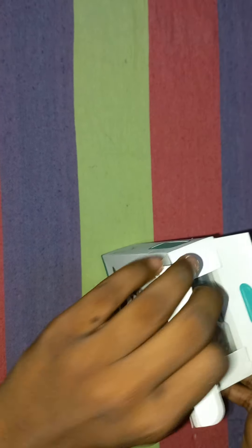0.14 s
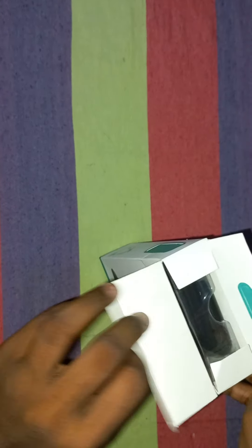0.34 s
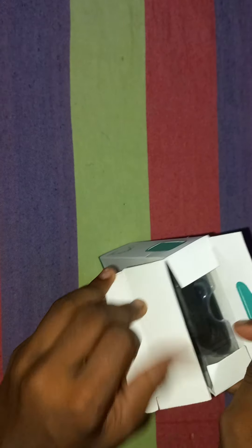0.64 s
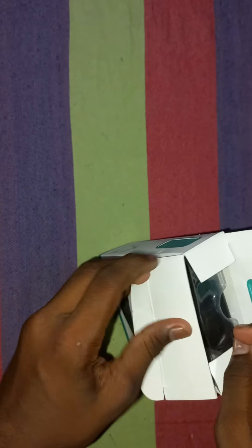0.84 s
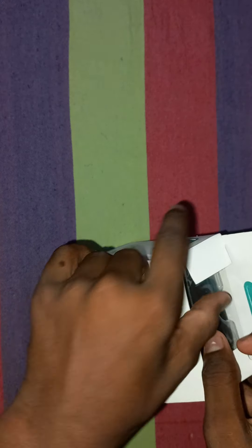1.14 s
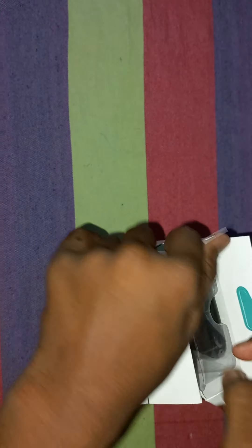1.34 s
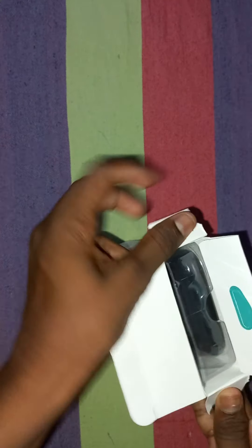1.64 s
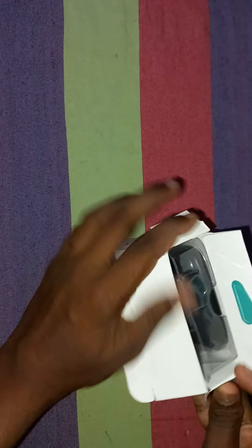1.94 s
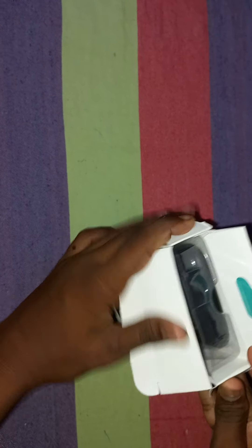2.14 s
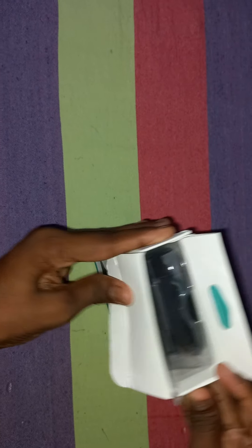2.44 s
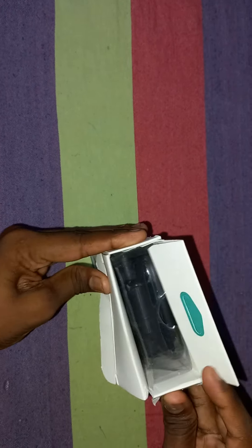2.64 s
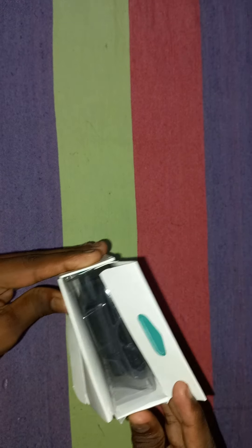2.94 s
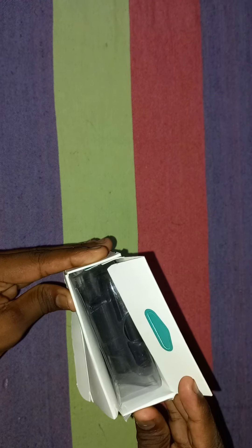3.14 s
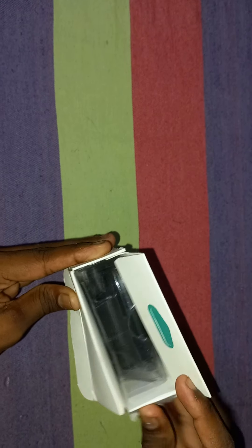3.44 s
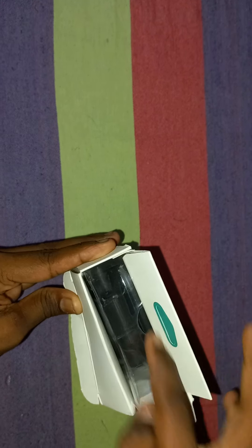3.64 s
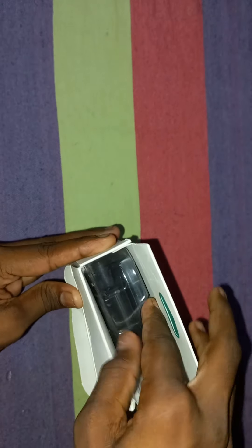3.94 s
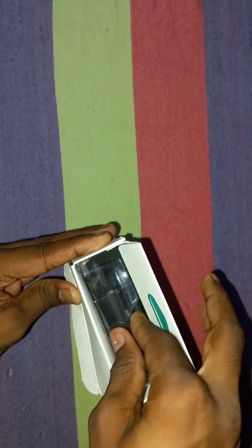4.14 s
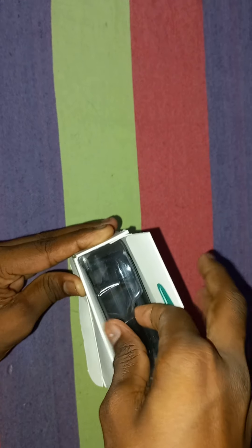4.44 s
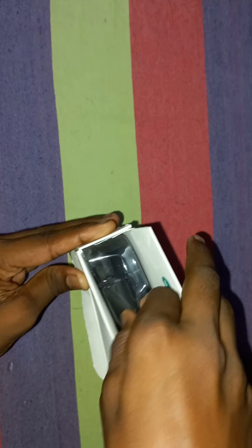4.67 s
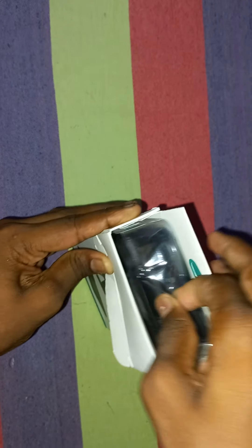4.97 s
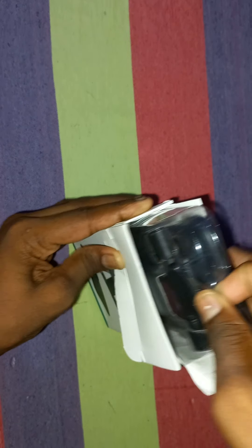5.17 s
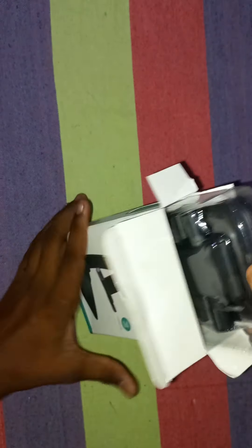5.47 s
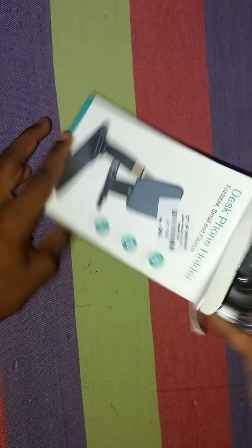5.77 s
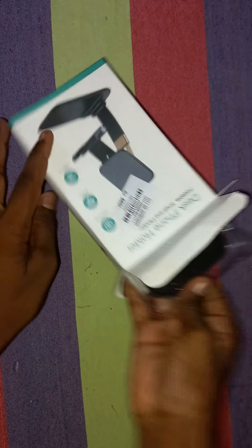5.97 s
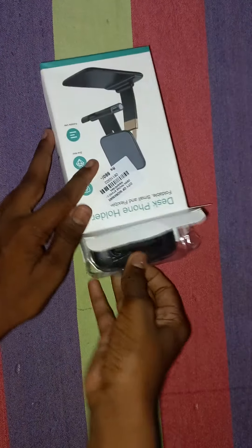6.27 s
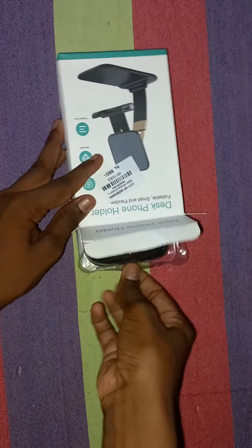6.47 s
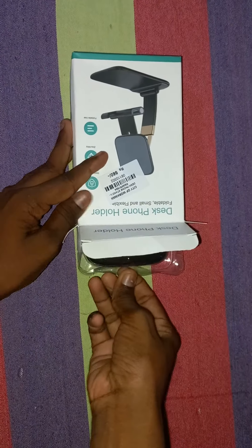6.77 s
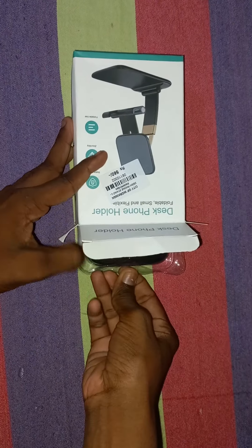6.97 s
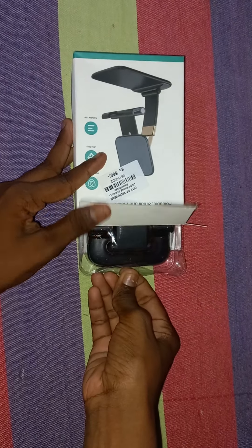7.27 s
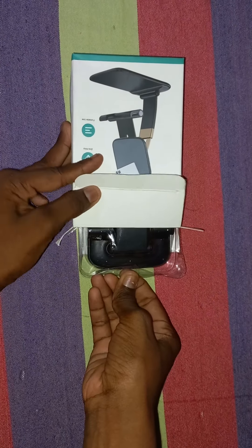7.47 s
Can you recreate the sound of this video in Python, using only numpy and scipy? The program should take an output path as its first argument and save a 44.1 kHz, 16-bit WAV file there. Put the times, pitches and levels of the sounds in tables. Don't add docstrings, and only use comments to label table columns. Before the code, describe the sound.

Indoors, close to a phone microphone, with handling brighter and stronger on the left. At 0 s a hard card snap and crunch burst out with a hollow knock, then grainy rubbing and small ticks thin out until 1.5 s. Around 1.65 s a tight cluster of cracks and a knock, a soft crunch at 2.05, rubbing with faint bumps near 2.2, and a single snap at 2.5. It is quiet from 3 to 4 s. From 4.05 to 5.7 s plastic crackles and snaps sharply, strongest near 4.6, 4.75 and 5.14, with steady hissy sliding around 5. Ticks and a light knock at 6.05, a snap at 6.3, then a soft low bump on the bed at 6.43 and a papery crunch at 6.8. Only tiny ticks remain to about 7.5. Beneath lie low traffic rumble, faint hum, and a distant engine rising in pitch, gone after 5 s.

```python
import sys
import numpy as np
from scipy import signal
from scipy.fft import rfft, irfft
from scipy.io import wavfile
from scipy.ndimage import uniform_filter1d

SR = 44100
rng = np.random.default_rng(int(sys.argv[2]) if len(sys.argv) > 2 else 0)


def wrap_up_sound(samples):
    columns = np.atleast_2d(samples).T
    tamed = np.clip(columns, -1, 1)
    steps = np.round(tamed * 32767).astype(np.int16)
    wavfile.write(sys.argv[1], SR, steps)


def amplitude_ratio(level_db):
    exponent = np.asarray(level_db, float) / 20
    return 10 ** exponent


N = 335601


def rms_one(x):
    return x / np.sqrt(np.mean(x ** 2) + 1e-20)


def peak_one(x):
    return x / np.max(np.abs(x), axis=-1, keepdims=True)


def in_time(rows):
    s, *columns = np.transpose(rows)
    return [np.interp(np.arange(N) / SR, s, column) for column in columns]


def at_hz(points, hz):
    point_hz, point_db = np.transpose(points)
    return np.interp(np.log(hz), np.log(point_hz), point_db)


def drift(rate):
    r = np.exp(-80 * np.pi * rate / SR)
    noise = rng.standard_normal(N // 40 + 2002)
    slow = signal.lfilter([1], [1, -2 * r, r * r], noise)[2000:]
    return np.interp(np.arange(N) / 40, np.arange(len(slow)), rms_one(slow))


def coloured(x, spectrum):
    hz = np.arange(1, N // 2 + 2) * SR / N
    inside = (hz > spectrum[0][0]) & (hz < spectrum[-1][0])
    return irfft(rfft(x) * amplitude_ratio(at_hz(spectrum, hz)) * inside, N)


def band(x, low_hz, high_hz):
    limits = [low_hz, min(high_hz, .45 * SR)]
    return signal.sosfilt(signal.butter(3, limits, "band", fs=SR, output="sos"), x)


def ring(x, hz, t60):
    r = amplitude_ratio(-60 / (t60 * SR))
    w = 2 * np.pi * min(hz, .45 * SR) / SR
    return signal.lfilter([0, np.sin(w)], [1, -2 * r * np.cos(w), r * r], x)


def add(out, s, sound):
    i = round(s * SR)
    out[:, i:i + sound.shape[1]] += sound[:, :N - i]


def air():
    # (time [s], level [dB])
    traffic = [(0.0, -50), (0.32, -51), (1.31, -56), (1.61, -47.5), (1.95, -55.5), (2.41, -50), (2.75, -54),
               (3.18, -53.5), (3.5, -60), (4.15, -50), (4.81, -58), (5.55, -53.5), (5.7, -60), (6.72, -51),
               (7.0, -61), (7.61, -57.5)]
    # (frequency [Hz], level [dB per Hz])
    air_colour = [(25, -34.5), (65, -6), (125, -5), (250, -19), (350, -16), (520, -18.5), (600, -24.5),
                  (1500, -25.5), (2400, -29.5), (3500, -38), (4600, -46), (6500, -44.5), (8300, -55),
                  (16500, -56.5)]
    # (frequency [Hz], likeness [0 to 1])
    likeness = [(60, 1), (180, 0.92), (550, 0.61), (1650, 0), (4970, 0.046), (15000, 0)]
    # (frequency [Hz], difference [dB])
    air_balance = [(60, 2.5), (380, -1.5), (2380, -3.5), (15000, 2)]
    rumble_db, = in_time(traffic)
    t = np.arange(N) / SR
    murmur_db = -53.5 + 0.051 * (rumble_db - rumble_db.mean())
    murmur_db -= 0.2669 * t
    murmur_db += 8.5 * np.exp(-t / 0.1)

    hz = np.arange(1, N // 2 + 2) * SR / N
    alike = np.sqrt(np.clip(at_hz(likeness, hz), 0, 1))
    mid, side = rfft(rng.standard_normal((2, N)))
    pair = np.sqrt(1 + alike) * mid + np.sqrt(1 - alike) * side * [[1], [-1]]
    pair *= amplitude_ratio(at_hz(air_colour, hz) + at_hz(air_balance, hz) * [[.5], [-.5]])
    bass = 1 / (1 + (hz / 270) ** 4)
    rumble = rms_one(irfft(pair * bass, N)) * amplitude_ratio(rumble_db + 0.926 * drift(9.7))
    murmur = rms_one(irfft(pair * (1 - bass), N)) * amplitude_ratio(murmur_db + 0.5 + 1.8 * drift(5.5))
    return rumble + murmur


def engine():
    # (time [s], firing rate [Hz], level [dB], double-rate tone against the first [dB])
    speed = [(0.0, 61, -49, -7), (0.08, 65, -43.5, -5.5), (0.82, 67.3, -50, -7.5), (1.3, 68.5, -59, -2),
             (1.6, 71.35, -53.5, -9), (2.2, 76.8, -58, 4), (2.75, 78.9, -58, -5), (3.25, 80.9, -52, -12),
             (3.5, 82, -71, 0), (3.75, 82.6, -51, -12), (4.19, 85.8, -49, -16), (4.72, 89.3, -56.5, -14),
             (5.0, 92, -60, -5)]
    # (frequency [Hz], rms level [dB])
    hums = [(100, -72), (124, -64), (198, -68)]
    hz, first_db, overtone_db = in_time(speed)
    second_db = first_db + overtone_db
    turn = 2 * np.pi * np.cumsum(hz + 0.62 * drift(9.2)) / SR
    first = amplitude_ratio(first_db + 1.64 * drift(7.6)) * np.sin(turn)
    second = amplitude_ratio(second_db + 2.0 * drift(11)) * np.sin(2 * turn)
    away = np.clip((speed[-1][0] - np.arange(N) / SR) / 0.33, 0, 1)
    hum = np.zeros(N)
    for hum_hz, db in hums:
        level = amplitude_ratio(db + 4.2 * drift(5.8))
        hum += level * np.sin(2 * np.pi * np.cumsum(hum_hz + 0.827 * drift(3.44)) / SR)
    return np.sqrt(2) * (away * (first + second) + hum)


def pressure(strokes, levels_db, rise, fall, rest_db):
    t = np.arange(0, N + 64, 64) / SR
    power = amplitude_ratio(2 * rest_db)
    for (s, hold_ms, *_), db in zip(strokes, levels_db):
        before = np.maximum(s - t, 0)
        after = np.maximum(t - s - hold_ms / 1000, 0)
        power = power + amplitude_ratio(2 * (db - rise * before - fall * after))
    return np.interp(np.arange(N) / SR, t, 10 * np.log10(power))


def rub():
    # (time [s], hold [ms], rustle [dB], hiss against rustle [dB])
    strokes = [(0.0, 50, -50, -8), (0.187, 8, -55, -2.5), (0.52, 8, -61, -6), (0.695, 90, -62.5, -5.5),
               (1.002, 8, -62.5, -2.5), (1.319, 8, -62, -3.5), (1.575, 8, -67, 1), (1.659, 8, -56, -3),
               (1.909, 150, -58, -1.5), (2.18, 124, -57.5, -0.5), (2.525, 8, -55.5, -6.5),
               (2.765, 31, -56, 0.5), (3.473, 110, -68, -3), (3.815, 29, -62, -3), (3.885, 18, -61, -5),
               (4.069, 8, -58.5, -3), (4.272, 8, -64, -5), (4.613, 8, -57.5, 2), (4.754, 30, -57.5, -8),
               (4.92, 220, -52.5, -3.5), (5.29, 60, -65, -1), (5.402, 40, -61.5, -6),
               (5.529, 15, -54, -3.5), (5.86, 8, -59, -4), (6.065, 8, -59.5, -5), (6.226, 8, -57, -4),
               (6.42, 66, -57.5, -5.5), (6.8, 27, -56.5, -4), (7.167, 8, -73.5, 0), (7.523, 8, -68, -8)]
    # (frequency [Hz], level [dB per Hz])
    rustle_colour = [(1200, -14), (2000, -3.5), (3200, 2.5), (4500, -12.5), (6300, -4.5), (8000, -15)]
    # (frequency [Hz], level [dB per Hz])
    hiss_colour = [(8000, -14), (9500, -11.5), (11500, -1.5), (13500, -3), (15800, -3)]
    # (frequency [Hz], level [dB per Hz])
    far_hiss_colour = [(4000, 7), (7000, -9.5), (10000, 1.5), (14000, -5), (15800, -3)]
    _, _, level_db, smooth_db = np.transpose(strokes)
    rustle_db = pressure(strokes, level_db, rise=140, fall=102.5, rest_db=-69)
    hiss_db = pressure(strokes, level_db + smooth_db, rise=269, fall=188, rest_db=-89.5)

    grains = amplitude_ratio(3.0 * np.minimum(rng.exponential(1, (2, N)), 5)) * rng.standard_normal((2, N))
    lone = rng.random(N) < 70 / SR
    grains *= 1 + 2.04 * uniform_filter1d(16.7 * lone, size=40)
    grains[1] = 0.23 * grains[0] + 0.9 * grains[1]
    catch_db = drift(74)
    near_hiss = rms_one(coloured(grains[0], hiss_colour))
    far_hiss = rms_one(coloured(grains[1], far_hiss_colour))
    hiss = np.array([near_hiss, far_hiss]) * amplitude_ratio(0.87 * catch_db)
    hiss *= amplitude_ratio([hiss_db + 1.0, hiss_db - 13.5])
    rustle = rms_one(coloured(grains, rustle_colour) * amplitude_ratio(0.72 * catch_db))
    return hiss + rustle * amplitude_ratio([rustle_db + 0.5, rustle_db - 11])


def slips(count, dense):
    x = rng.standard_normal((2, count)) * (rng.random(count) < dense)
    return np.array([x[0], 0.35 * x[0] + 1.96 * x[1]])


def near_bands(body, burst_upper, burst_treble, upper_db, treble_db, scale):
    sound = scale(body) * amplitude_ratio([[0], [-13.5]])
    sound = sound + scale(burst_upper) * amplitude_ratio([[upper_db], [upper_db - 13]])
    return sound + scale(burst_treble) * amplitude_ratio([[treble_db], [treble_db - 20.5]])


def crunches():
    # (time [s], length [ms], body [dB], 6 kHz against body [dB], treble against body [dB])
    folds = [(.025, 27, -38.5, -11, -5), (0.773, 21, -66.5, -9, 2), (0.986, 34, -56.5, -9, -6),
             (1.637, 13, -55, -12, -2), (2.053, 39, -46.5, -17, -4), (4.045, 41, -48.5, -8.5, -8),
             (6.44, 34, -54.5, -9, -10), (6.802, 51, -53, 1, -6)]
    out = np.zeros((2, N))
    flap_hz = 3140
    t_ms = np.arange(4096) / SR * 1000
    for s, length_ms, body_db, upper_db, treble_db in folds:
        burst = slips(4096, dense=.4)
        clumps = amplitude_ratio(4.0 * np.repeat(rng.standard_normal(64), 64))
        burst *= clumps * np.clip((length_ms - t_ms) / 6, 0, 1) * np.clip(t_ms / 5, 0, 1)
        flap = ring(burst, flap_hz, 0.0072) + 0.49 * ring(burst, 0.537 * flap_hz, 0.0085)
        body = rms_one(band(flap, 1300, 7100)) + 0.58 * rms_one(band(burst, 1450, 4050))
        upper, treble = band(burst, 5430, 6800), band(burst, 10600, 18400)
        sound = near_bands(body, upper, treble, upper_db, treble_db, rms_one)
        add(out, s, amplitude_ratio(body_db) * np.sqrt(t_ms[-1] / length_ms) * sound)
    return out


def ticks(table):
    pitches = rng.uniform(2270, 3450, len(table))
    return [(s, db, hz, -6.5 + 0.75 * treble_db, treble_db)
            for (s, db, treble_db), hz in zip(table, pitches)]


def snaps():
    # (time [s], peak [dB], strongest ring [Hz], 6 kHz against peak [dB], treble against peak [dB])
    cracks = [(0.0254, -20, 2980, -9, 0), (0.043, -6, 3900, -16.5, -8.5), (0.0523, -26, 4460, -2, 9.5),
              (0.149, -30.5, 4200, -8, 1), (1.6483, -18.5, 3280, -13, 0), (1.653, -14, 3060, -10, -8),
              (1.666, -15, 2970, -12, -2.5), (2.4912, -22, 3220, -13.5, -8), (4.057, -26.5, 3070, -24, -2),
              (4.169, -30.5, 2850, -20, -17), (4.416, -24, 3040, -17, -19),
              (4.563, -30.5, 2660, -11.5, -22), (4.6013, -14.5, 2600, -10, 1.5),
              (4.6573, -27.5, 2380, -14, -12), (4.7445, -17, 2650, -7.5, 4.5), (4.7574, -23, 3865, -8, -4),
              (4.8533, -17.5, 2926, -18, -12), (5.14, -12.5, 3340, -8.5, 0.5), (5.3972, -25, 2030, -20, -7),
              (5.5114, -23.5, 2840, -10, -19), (5.5159, -18, 3600, -7.5, 14), (5.694, -41.5, 1614, 6, 2),
              (6.3109, -18, 3630, -11, -7.5), (6.45, -27, 2900, -11, -13.4)]
    # (time [s], peak [dB], treble against peak [dB])
    flap_ticks = [(0.2068, -36.5, 4.5), (0.298, -40.5, -3), (0.3424, -48, 7), (0.454, -55, 6),
                  (0.5446, -35.5, -25), (0.673, -40.5, -7), (0.787, -34.5, -12), (0.9082, -39.5, -12),
                  (0.9941, -45, -8), (1.009, -33, -6), (1.3233, -43.5, 2), (1.435, -54, 6),
                  (1.5586, -37.5, -4), (1.5937, -38, -11), (2.0266, -34, -19), (2.0607, -32, -22),
                  (2.201, -41, -3), (2.7065, -39, -6), (2.9175, -46, -25), (2.9986, -48, -4),
                  (3.452, -48.5, 2), (3.5454, -59, 10), (6.8125, -31.5, -0.5), (6.8315, -44, 3),
                  (7.148, -48, -2), (7.4994, -63, 8), (7.533, -42.5, -19)]
    # (time [s], peak [dB], treble against peak [dB])
    tray_ticks = [(4.0183, -64, 20), (4.0895, -35.5, -17), (4.282, -39.5, -32), (4.3908, -45, -19),
                  (4.477, -43, -6), (4.5114, -39.5, -12), (4.533, -61, 15), (4.7205, -41, 4),
                  (4.92, -30, -1.5), (5.1165, -40, 5.5), (5.2325, -38.5, 0.5), (5.276, -51, 10),
                  (5.298, -42.5, -0.5), (5.326, -42.5, -14.5), (5.339, -36, -12), (5.392, -48.5, -9.5),
                  (5.4306, -43, -8), (5.4625, -36, -4), (5.528, -39, 11), (5.841, -32, -5.5),
                  (6.051, -30, -8.5), (6.1558, -37, -6), (6.202, -55, 15), (6.2353, -35, -8),
                  (6.4283, -38, -10)]
    out = np.zeros((2, N))
    t = np.arange(2048) / SR
    sheet_t60 = 0.0042
    for s, peak_db, mode_hz, upper_db, treble_db in cracks + ticks(flap_ticks) + ticks(tray_ticks):
        length_ms = 6.53 - 0.26 * (peak_db + 19) + 0.1 * max(treble_db, 0)
        burst = slips(len(t), dense=.3)
        burst[:, 0] = 3.96
        fade = amplitude_ratio(-20 * (1000 * t / max(length_ms, .5)) ** 1.36)
        settling = amplitude_ratio(-18.5 - 470 * t)
        burst *= fade + settling

        near_mode = ring(burst[0], mode_hz, sheet_t60)
        far_mode = ring(burst[1], .8 * mode_hz, sheet_t60)
        mode = np.array([near_mode, far_mode])
        mode += .5 * ring(burst, rng.uniform(2200, 3900), sheet_t60)
        mode += 0.13 * ring(burst, 0.66 * mode_hz, sheet_t60)
        body = peak_one(band(mode, 1380, 6100)) + 0.13 * peak_one(band(burst, 2200, 3900))
        upper, treble = band(burst, 5560, 7600), band(burst, 10770, 15960)
        sound = near_bands(body, upper, treble, upper_db, treble_db, peak_one)
        add(out, s, amplitude_ratio(peak_db) * sound)
    return out


def thuds(table, t60, swell_ms, level_db):
    out = np.zeros((2, N))
    push = np.zeros(8192)
    touch = np.hanning(max(round(swell_ms * SR / 1000), 3))
    for s, peak_db, hz in table:
        push[:len(touch)] = touch * np.sin(2 * np.pi * hz * np.arange(len(touch)) / SR)
        sound = ring(push, hz, t60)
        sound += 0.21 * ring(push, 1.174 * hz, t60)
        sound += 0.34 * ring(push, .5 * hz, 1.23 * t60)
        add(out, s, amplitude_ratio(peak_db + level_db) * peak_one(sound) * np.ones((2, 1)))
    return out


def knocks():
    # (time [s], peak [dB], pitch [Hz])
    taps = [(0.0426, -27.5, 453), (0.059, -35, 427), (1.647, -29, 460), (1.659, -33.5, 445),
            (2.491, -41.5, 960), (4.053, -48, 377), (4.168, -39.5, 530), (4.414, -42.5, 860),
            (4.922, -40.5, 427), (5.138, -39, 374), (6.047, -32, 370), (6.059, -37, 400), (5.032, -45, 900),
            (5.606, -47, 600), (6.815, -48, 1050)]
    out = thuds(taps, t60=0.057, swell_ms=2.2, level_db=0.14)
    t = np.arange(2048) / SR
    for s, peak_db, _ in taps:
        clatter = band(slips(len(t), dense=0.076) * amplitude_ratio(-2500 * t), 695, 1030)
        add(out, s, amplitude_ratio(peak_db - 2.0) * peak_one(clatter) * amplitude_ratio([[0], [-4]]))
    return out


def bumps():
    # (time [s], peak [dB], pitch [Hz])
    landings = [(2.2, -43, 70), (2.285, -42.5, 117.8), (6.45, -40, 60.4), (5.43, -44.5, 123),
                (6.05, -41.5, 123), (6.426, -31, 120.6), (6.519, -38.5, 116), (7.43, -45, 122.5)]
    return thuds(landings, t60=0.12, swell_ms=45, level_db=0.1)


def room(x):
    t = np.arange(SR // 2) / SR
    t60 = 0.33
    tail = rng.standard_normal((2, len(t))) * amplitude_ratio(-60 * t / t60) * (t > .006)
    dulled = signal.lfilter([1], [1, -0.42], tail)
    tail = rms_one(dulled) / np.sqrt(len(t))
    return signal.fftconvolve(tail, x[:1], axes=1)[:, :N]


def scene():
    hits = snaps() + crunches() + knocks() + bumps()
    near = hits + rub()
    far = air() + engine()
    near[1] = np.roll(near[1], 8)
    far[1] = np.roll(far[1], 6)
    return near + amplitude_ratio(-21) * room(hits) + far


def band_limit(x):
    return signal.sosfilt(signal.butter(12, 17150, fs=SR, output="sos"), x)


def record(dry):
    top = signal.cheby2(10, 60, 16900, fs=SR, output="sos")
    mix = signal.sosfilt(top, dry)
    return band_limit(mix)


dry = scene()
out = record(dry)
wrap_up_sound(out)
```